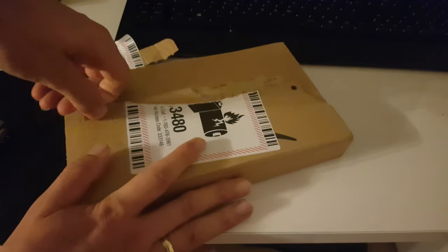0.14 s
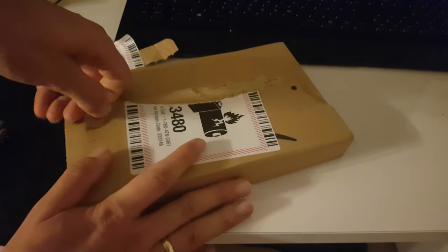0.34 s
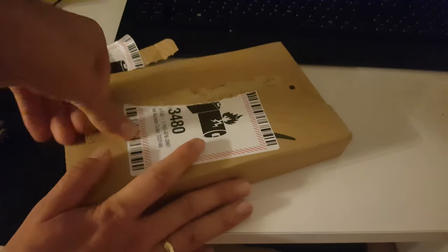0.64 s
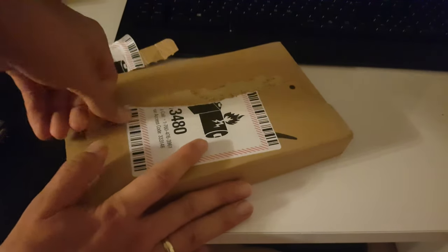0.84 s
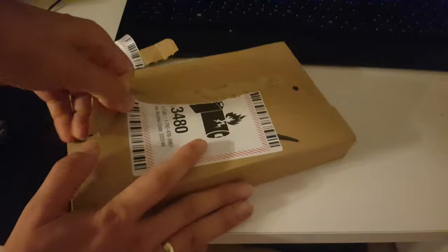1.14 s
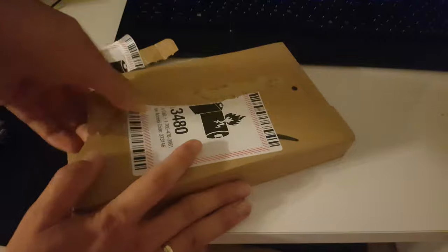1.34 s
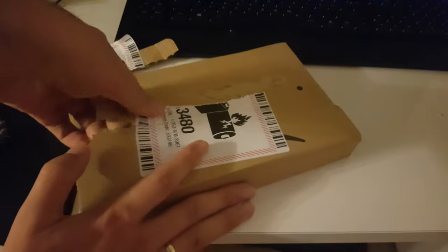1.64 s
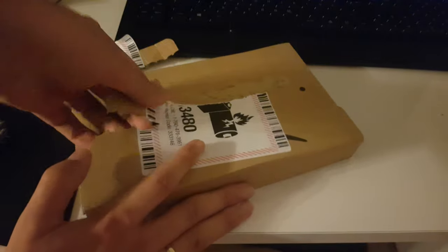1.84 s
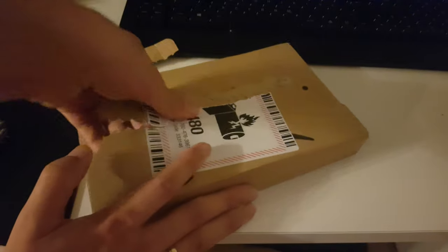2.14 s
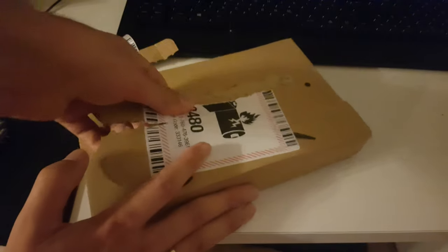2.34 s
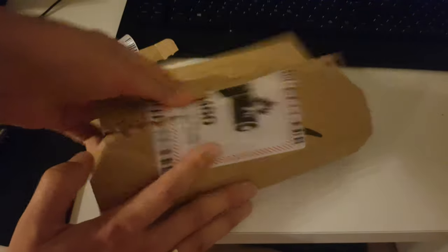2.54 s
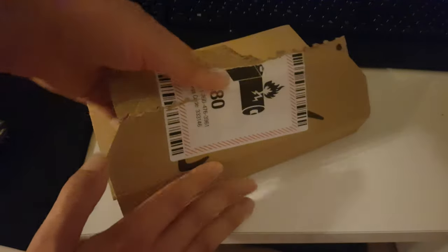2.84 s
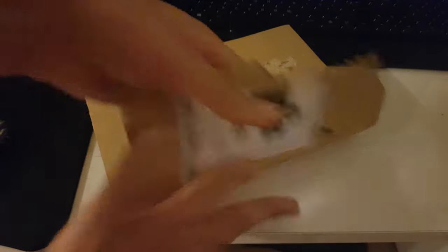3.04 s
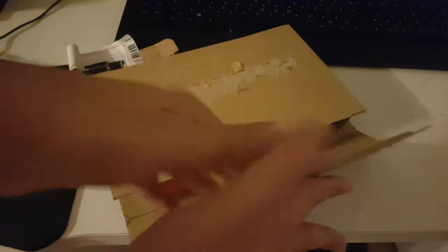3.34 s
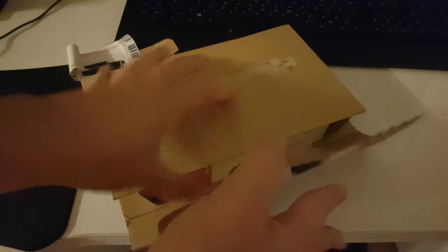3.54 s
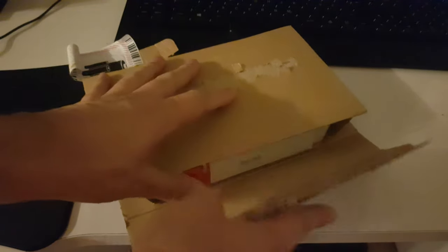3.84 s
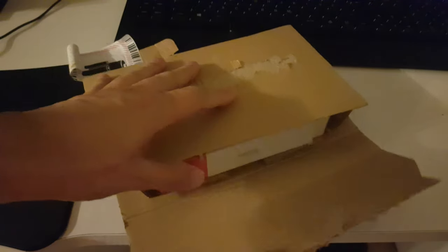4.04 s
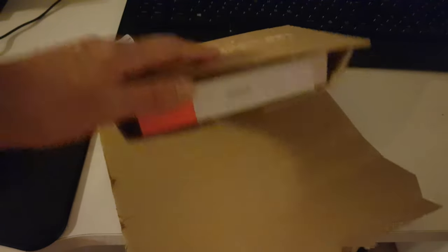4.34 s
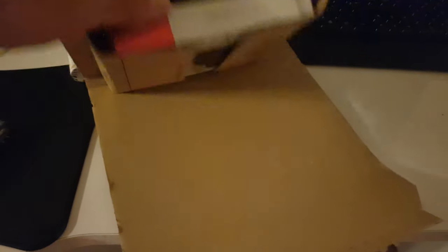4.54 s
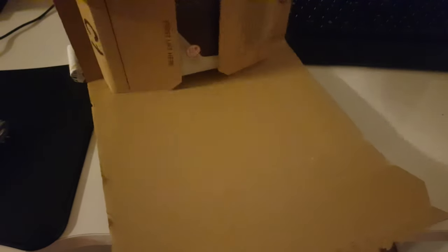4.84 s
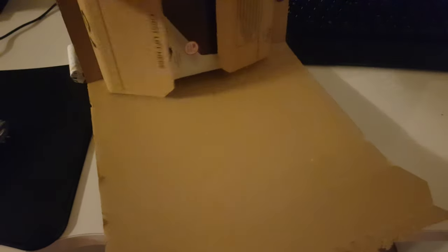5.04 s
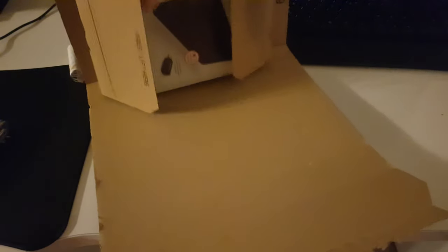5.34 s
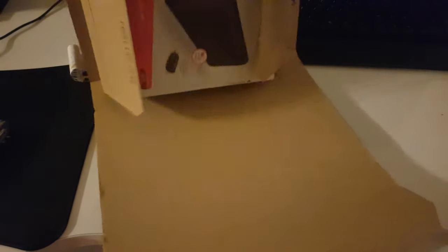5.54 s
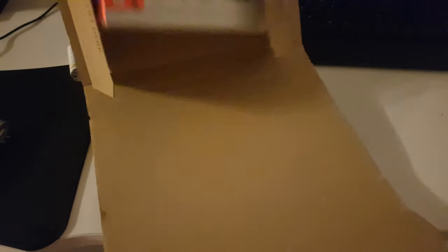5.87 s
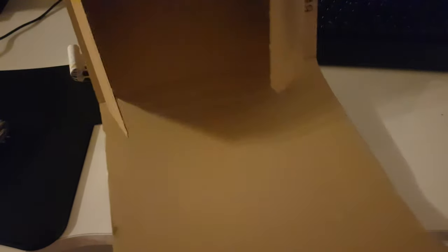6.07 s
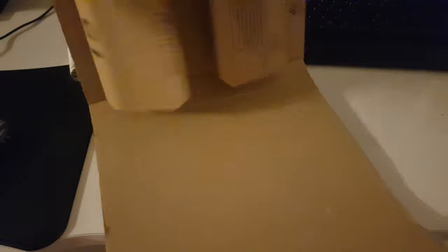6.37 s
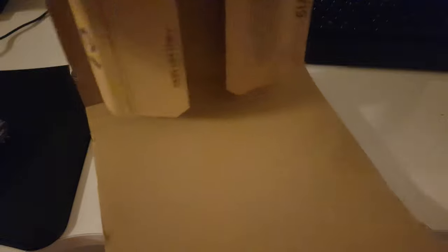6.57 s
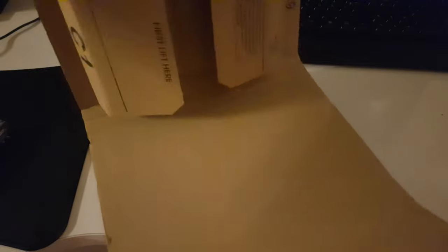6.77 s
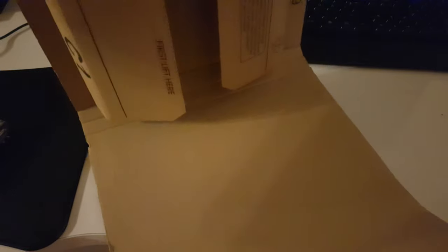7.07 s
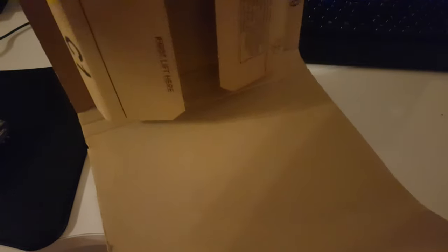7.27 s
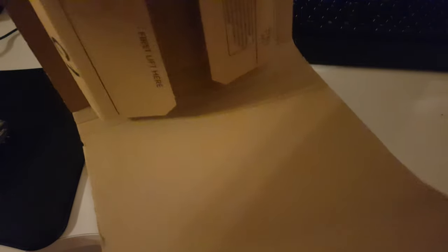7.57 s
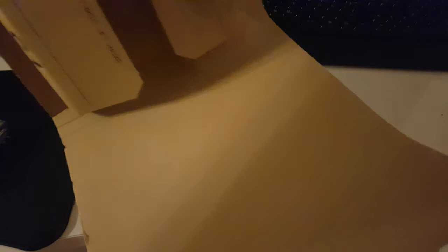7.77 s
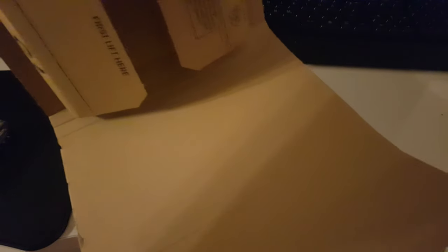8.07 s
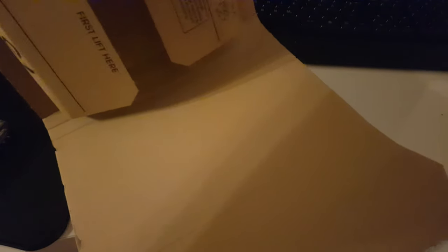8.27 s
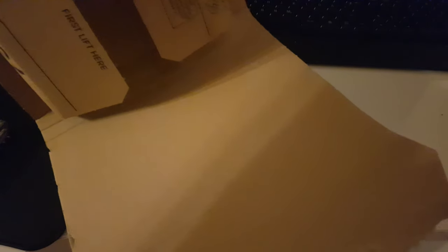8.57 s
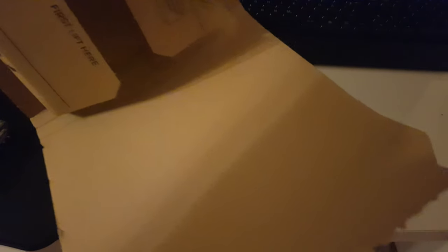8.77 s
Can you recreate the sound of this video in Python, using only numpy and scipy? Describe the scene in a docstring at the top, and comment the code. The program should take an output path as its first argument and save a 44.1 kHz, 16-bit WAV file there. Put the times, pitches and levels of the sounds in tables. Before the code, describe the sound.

Close, dry cardboard tearing with sharp snaps and a brief groan, a heavy final pop, then soft rubbing, scraping contents and faint hollow taps.

```python
"""Opening a glued cardboard box

Hands tear the glued flap of a box on a desk, fold it open, slide the contents out and shift the board.
Fibres part in clumps of random clicks, and glue spots let go as fading bursts of noise with a ringing pop.
Filtered noise rustles, rubs and hums; the board walls and the desk top ring along as tuned resonances.
Two microphone ports a few centimetres apart hear it with a small room's echoes, over their own hiss."""
import sys
import numpy as np
from scipy import signal
from scipy.fft import rfft, irfft
from scipy.io import wavfile

SR = 44100
rng = np.random.default_rng(int(sys.argv[2]) if len(sys.argv) > 2 else 0)


def bounce(signal):
    """Save signal as a 16-bit WAV file at the path given by the first command-line argument."""
    frames = np.transpose(np.atleast_2d(signal))
    limited = np.clip(frames, -1, 1)
    pcm = np.round(limited * 32767).astype(np.int16)
    wavfile.write(sys.argv[1], SR, pcm)


N = 392931

# Levels in the tables are set before the sound's own filters and the final mix.
# In spectrum tables (f/Hz, level/dB) only the shape counts: the overall level is set elsewhere.

# Sudden tugs and jolts:
# (full from t/s, hold t/s, fibre level/dB, paper level/dB, board level/dB, desk level/dB)
TUGS = [(0.0, 0.031, -46.5, -56, -43, -58), (0.102, 0.019, -56.5, -55, -47, -44),
        (0.255, 0.0097, -30.5, -45, -43, -42), (0.425, 0.16, -50.5, -61.5, -45.5, -52),
        (0.571, 0.0046, -42.5, -47, -35.5, -39.5), (0.646, 0.0044, -64, -64, -47, -68.5),
        (0.825, 0.068, -33, -46, -33, -58.5), (0.871, 0.23, -37.5, -43, -39.5, -84),
        (1.013, 0.026, -33.5, -36, -34.5, -47), (1.143, 0.058, -44.5, -44, -47.5, -73),
        (1.196, 0.0025, -34, -41, -34.5, -53), (1.283, 0.051, -50.5, -60, -43, -42),
        (1.337, 0.023, -42, -45, -32.5, -42.5), (1.435, 0.018, -43, -54, -48, -49),
        (1.472, 0.015, -52, -29, -30.5, -43), (1.552, 0.031, -40, -42, -42.5, -43.5),
        (1.642, 0.044, -38, -43, -43.5, -62), (1.695, 0.026, -32, -34, -36, -44),
        (1.748, 0.024, -36.5, -41, -35, -42), (1.84, 0.008, -61, -33.5, -30.5, -42),
        (1.983, 0.0016, -31, -24.5, -17, -28.5), (2.171, 0.048, -50, -48, -48, -45.5),
        (2.292, 0.16, -49, -47, -55, -79), (2.475, 0.0055, -49.5, -38.5, -36, -37),
        (2.552, 0.01, -24, -23, -23, -25.5), (2.809, 0.0063, -50, -46, -41.5, -65.0),
        (3.082, 0.041, -59, -61, -56, -53.5), (3.162, 0.016, -56, -57.5, -56.5, -54),
        (3.441, 0.0027, -64.5, -64, -64, -61), (3.596, 0.0079, -50, -46, -37.5, -32.5),
        (4.153, 0.14, -61, -60.5, -55, -66), (4.326, 0.035, -69, -57, -50, -54.5),
        (5.604, 0.01, -37, -40, -35, -44), (5.615, 0.01, -40.5, -30, -29, -31),
        (6.442, 0.073, -64, -61.5, -54.5, -52.5), (7.55, 0.091, -81, -71, -69.5, -75.5),
        (7.662, 0.082, -72, -63, -56.5, -50), (7.727, 0.079, -60, -53, -47, -50),
        (8.599, 0.0024, -75, -72, -52.5, -47.5), (8.655, 0.008, -86, -74, -57.5, -53)]
# Strokes of hand or board that swell and fade, same columns as the tugs
STROKES = [(2.96, 0.028, -58.5, -59, -54, -59), (3.28, 0.096, -64, -69, -82, -80.5),
           (3.742, 0.0034, -63.5, -54.5, -71, -53), (3.975, 0.16, -63, -62.5, -54.5, -86),
           (4.626, 0.12, -53.5, -51.5, -53.5, -91), (4.8, 0.0046, -56.5, -44.5, -47, -74),
           (4.985, 0.041, -50.5, -42.5, -48, -58), (5.07, 0.016, -50, -43, -43, -55),
           (5.105, 0.01, -44.5, -38.5, -48, -50), (5.257, 0.0074, -39, -34, -40.5, -45),
           (5.324, 0.011, -44.5, -41, -45, -42.5), (5.415, 0.04, -39, -38, -38, -39.5),
           (5.505, 0.023, -46, -41.5, -42, -45), (5.913, 0.2, -46.5, -50.5, -59, -42),
           (6.207, 0.15, -53, -53, -49.5, -48.5), (6.568, 0.061, -54.5, -63, -53, -51.5),
           (6.888, 0.043, -89, -92, -70, -64), (7.062, 0.046, -85.5, -78, -66, -68),
           (7.299, 0.03, -88.5, -77, -65, -54.5), (8.134, 0.033, -75.5, -67.5, -62, -66),
           (8.465, 0.081, -77.5, -69, -64.5, -85), (8.72, 0.067, -85, -80.5, -62.5, -76),
           (8.8, 0.06, -69.5, -66.5, -60.5, -71)]
# Steady contact of hands, box and desk: (t/s, paper level/dB, desk level/dB)
CONTACT = [(0.0, -55.5, -52.5), (0.4, -59.5, -61), (0.8, -50, -46), (1.3, -58, -64), (1.95, -46, -58),
           (2.02, -44.5, -36.5), (2.25, -50, -55), (2.55, -49.5, -57), (2.64, -39.5, -31), (2.9, -61, -54),
           (3.3, -71.5, -87.5), (3.53, -94, -74), (3.65, -56, -47), (3.9, -74.5, -64), (4.45, -61, -63),
           (5.0, -58, -57.5), (5.7, -48.5, -44), (6.3, -52, -79), (6.45, -78.5, -70), (6.75, -75, -67.0),
           (7.2, -89, -81.5), (8.91, -88, -80)]
TUG_RISE_DB_PER_S, TUG_FALL_DB_PER_S = 13998.5, 341.5
STROKE_RISE_DB_PER_S, STROKE_FALL_DB_PER_S = 276, 305
DESK_FALL_SHARE = 0.79   # the desk fades more slowly than the other layers
CONTACT_FIBRE_DB, CONTACT_BOARD_DB = -1.5, 3.5   # over the paper level
TORN_S, EMPTIED_S = 2.9, 6.4   # the flap is off; the box is empty

# Spectrum of the parting fibres: (f/Hz, level/dB)
FIBRE_SPECTRUM = [(1470, -32), (2500, -7.5), (2810, -11), (3160, 2.5), (5050, -6.5), (7180, -7.5),
                  (12600, -5), (15300, -11), (16200, -22.5)]
# Spectrum of the rustling paper: (f/Hz, level/dB)
PAPER_SPECTRUM = [(680, -17), (1150, -14.5), (1450, -1), (1740, 3.5), (2260, -3), (2900, -2.5), (3770, -38),
                  (6380, -120)]
# Spectra of the creasing walls, box full and box empty: (f/Hz, level/dB)
FULL_BOARD_SPECTRUM = [(150, -31.5), (260, -9.5), (439, 1), (594, -9), (706, -1), (1350, -9.5),
                       (1760, -34.5), (2970, -120)]
EMPTY_BOARD_SPECTRUM = [(150, -30), (260, -22), (350, -1.5), (497, -6.5), (833, 3.5), (1220, -2),
                        (1350, -18), (1760, -34), (2970, -120)]
# Spectra of the desk rumble, box full and box empty: (f/Hz, level/dB)
FULL_RUMBLE_SPECTRUM = [(18, -46), (30, -8.5), (64, -4), (124, 0.5), (166, -5.5), (310, -5), (400, -42),
                        (680, -120)]
EMPTY_RUMBLE_SPECTRUM = [(18, -93), (30, -21), (46, -26), (183, -14), (268, -18), (310, -33), (400, -23.5),
                         (680, -120)]

# Glue spots and creases letting go:
# (t/s, crack level/dB, board pop level/dB, board pop f/Hz, bright edge level/dB)
SNAPS = [(0.103, -42, -24, 860, -58), (0.122, -34.5, -34, 385, -41), (0.225, -25, -49, 382, -33.5),
         (0.266, -25, -62, 993, -49), (0.276, -16.5, -34, 406, -20), (0.579, -20.5, -26, 840, -25),
         (0.737, -42.5, -18.5, 846, -50.5), (0.8243, -6.5, -29, 435, -11),
         (0.8295, -16.5, -39.5, 430, -46.5), (0.897, -20, -40, 500, -16), (0.9005, -5.5, -36.5, 537, -19),
         (0.9023, -14, -36, 500, -14), (0.9187, -10, -23.5, 460, -17.5), (0.9365, -28, -22, 1170, -27.5),
         (1.021, -18, -16, 1070, -23), (1.035, -14, -16.5, 490, -16), (1.0735, -27, -33, 420, -20),
         (1.1496, -21.5, -20.5, 1040, -22), (1.1755, -36, -50, 900, -30), (1.183, -30, -42, 900, -32.5),
         (1.1996, -17, -35, 1050, -20), (1.2883, -40, -26, 456, -52), (1.3, -48, -22.5, 463, -52.5),
         (1.3476, -23.5, -26, 850, -29), (1.365, -26, -12, 880, -45.5), (1.4738, -9.5, -10, 1130, -9.5),
         (1.4833, -6, -29, 623, -32.5), (1.488, -5, -37, 496, -10.5), (1.668, -18.5, -40, 1100, -19),
         (1.701, -16, -24.5, 275, -14), (1.706, -28, -17, 855, -34.5), (1.84, -31, -16, 383, -36),
         (1.982, -7.5, -7, 573, -16), (2.1834, -42, -36, 474, -24.5), (2.4383, -23, -31.5, 1030, -43),
         (2.4787, -35.5, -18, 464, -48), (2.4976, -34, -14, 477, -56.5), (2.519, -60.5, -29.5, 480, -71.5),
         (2.5515, -9.5, -1.5, 1470, -17.5), (2.569, -10, -18, 380, -23), (2.5881, -13, 5.5, 1280, -29),
         (2.753, -30.5, -25, 705, -34), (2.809, -27, -24, 1180, -29.5), (3.086, -46, -49, 596, -53),
         (3.097, -44, -49, 780, -45), (3.118, -46, -42, 900, -43), (3.5944, -46, -29, 724, -41),
         (4.1604, -30.5, -37, 460, -34), (4.327, -41.5, -30.5, 790, -50), (4.8702, -28, -29.5, 940, -34),
         (5.191, -49, -28.5, 750, -61), (5.385, -31, -59, 580, -35), (5.615, -21.5, -17, 930, -32),
         (5.872, -28, -51, 930, -30), (6.059, -32, -46, 930, -29.5), (6.212, -38, -40, 400, -42),
         (7.8188, -56.5, -38, 996, -62.5), (8.599, -55.5, -33.5, 960, -50), (8.654, -55, -39.5, 926, -64)]
SNAP_T60_S, SHIVER_T60_S, SHIVER_DB = 0.0064, 0.072, -21   # T60: time to fade by 60 dB
POP_T60_S, POP_SHORTENS = 0.034, 1.8   # fade time at 500 Hz; how steeply higher pops die sooner
POP_OVERTONE, POP_OVERTONE_DB = 1.73, -9   # second mode: multiple of the pop's pitch, relative level
SMALL_WALL_HZ = 560   # only pops above this pitch have the second mode
EMPTY_POPS_LAST = 2.8   # times longer in the emptied box

# The flap buckling with a low groan: (t/s, slip rate f/Hz, level/dB)
GROAN = [(1.836, 128, -36.5), (1.852, 108, -17), (1.891, 130, -18.5), (1.936, 110, -21), (1.981, 110, -25)]
# Resonances of the groaning box: (f/Hz, width f/Hz, level/dB)
GROAN_BODY = [(118.4, 9, 0), (330, 90, -5), (231, 50, -8)]
SLIP_JITTER, SLIP_SPREAD_DB = 0.16, 3.5   # unevenness of pace and of strength
GROAN_RUB = 0.03   # friction noise between slips

# Ringing walls, box full and box empty: (f/Hz, width f/Hz, level/dB)
WALL_RING = [(498, 83, 0)]
EMPTY_RING = [(189, 8.1, -0.5), (820, 83, 0), (1027, 50, 7)]
WALL_RING_DB, EMPTY_RING_DB = -8.5, 0.5   # relative to the board level
# The loose flap, its pitch following the bend: (t/s, pitch f/Hz, level over the paper level/dB)
FLAP = [(0.0, 1554, -7), (0.16, 1630, 7), (0.27, 1630, -3), (1.9, 1500, -10), (2.05, 1460, 3.5),
        (2.35, 1553, 3), (2.55, 1500, -13), (3.2, 1654, -0.5), (4.9, 1564, -17), (5.85, 1455, -23),
        (6.0, 1554, 7.5), (6.15, 1570, -10.5), (8.91, 1644, 0)]
# Modes of the flap: (multiple of the flap's pitch, bandwidth setting f/Hz, level/dB)
FLAP_RING = [(1, 59.06, 2), (1.28, 68.9, -8)]

# Contents sliding in the open box: (t/s, hollow hum level/dB, low drone level/dB)
SLIDE = [(5.63, -38, -44), (5.76, -44, -52.5), (5.88, -47, -53), (5.975, -34, -33.5), (6.034, -31.5, -31),
         (6.056, -24, -36), (6.108, -28, -33.5), (6.182, -34.5, -52), (6.37, -49, -57)]
# Resonances of the hollow of the box: (f/Hz, width f/Hz, level/dB)
HOLLOW = [(893, 18, 0), (945, 22, -5), (1020, 70, -13)]
# Resonance of the long wall: (f/Hz, width f/Hz, level/dB)
DRONE = [(159, 12, 0)]

# Box and hands landing on the desk: (t/s, strength level/dB, extra level of upper modes/dB)
KNOCKS = [(0.567, -45, 0), (0.826, -36, 6), (1.278, -41, 13), (2.583, -11.5, -7.5), (3.448, -36, -19),
          (3.594, -25.5, -1), (4.068, -35, -2), (5.619, -42, -4), (7.817, -39, -11.5), (8.597, -44.5, 4),
          (8.653, -48, 7.5)]
# Modes of the desk top: (f/Hz, level/dB, time to fade by 60 dB t/s)
DESK = [(74.5, -7, 0.34), (112, -7.5, 0.21), (128.5, 0, 0.3), (234, -2, 0.34), (359, 0.5, 0.05)]

# Spectrum of what the surroundings send back: (f/Hz, level/dB)
WALLS_SPECTRUM = [(60, -19), (300, -14.5), (550, -13.5), (1100, -5), (5000, -0.5), (16000, -3)]
EARLY_T60_S, EARLY_DB = 0.0035, 3.5
ROOM_T60_S, ROOM_DB = 0.28, -5
HAND_MOVE_S, FIRST_ECHO_S = .005, .0003   # time between spots; silence before the first echo

# How much louder the left port is than the right: (f/Hz, level/dB)
LEFT_GAIN = [(60, 2.2), (500, 1.6), (2000, 2.8), (8000, 5), (15000, 3.3)]
LEFT_LEAD_S = 0.00018
# Spectrum of the ports' hiss: (f/Hz, level/dB)
HISS_SPECTRUM = [(24, -28.5), (40, -1.5), (81, 5.5), (200, -8.5), (506, -16.5), (1020, -12), (1250, -18.5),
                 (5500, -24.5), (7620, -32.5), (9800, -20.5), (12000, -14.5), (15000, -12.5), (16200, -9)]
HISS_DB = -66
MIC_LOW_CUT_HZ, CUTOFF_HZ = 40, 16450


def effort():
    """Harder work is louder: tugs and strokes add power to steady contact; gives four levels in dB."""
    tugs = moves(TUGS, TUG_RISE_DB_PER_S, TUG_FALL_DB_PER_S)
    strokes = moves(STROKES, STROKE_RISE_DB_PER_S, STROKE_FALL_DB_PER_S)
    paper_db, desk_db = in_time(CONTACT)
    steady = [paper_db + CONTACT_FIBRE_DB, paper_db, paper_db + CONTACT_BOARD_DB, desk_db]
    ms = np.arange(N) / SR * 1000
    levels = []
    for power, steady_db in zip(tugs + strokes, steady):
        total = np.interp(ms, np.arange(len(power)), power) + from_db(2 * steady_db)
        levels.append(10 * np.log10(total))
    return levels


def moves(table, rise_db_per_s, fall_db_per_s):
    """Power of fibres, paper, board and desk, every millisecond: each move rises, holds and falls."""
    t, rows = np.arange(0, N / SR + .002, .001), np.array(table)
    start, hold = rows[:, :1], np.abs(rows[:, 1:2])
    early = rise_db_per_s * np.maximum(start - t, 0)
    late = fall_db_per_s * np.maximum(t - start - hold, 0)
    power = from_db(2 * rows[:, 2:]).T   # twice the dB: power instead of gain
    upper = power[:3] @ from_db(-2 * (early + late))
    desk = power[3:] @ from_db(-2 * (early + DESK_FALL_SHARE * late))
    return np.vstack([upper, desk])


def handling(levels):
    """Fibres crackle in clumps, paper and walls rustle, the desk rumbles; smooth rubbing follows the tear."""
    fibre_db, paper_db, board_db, desk_db = levels
    torn, empty = (np.arange(N) > s * SR for s in (TORN_S, EMPTIED_S))
    jerks = drift(96) * np.where(torn, .1, .7)
    rub = np.where(torn, 7, .9)
    fibres = from_db(fibre_db + 2.3 * jerks) * grains(per_s=1200.0, spread_db=1.5, rub=rub)
    paper = from_db(paper_db + 1.5 * jerks) * grains(per_s=1600.0, spread_db=1.5, rub=rub)
    creases = from_db(board_db + 2 * jerks) * grains(per_s=1300.0, spread_db=2.0, rub=rub)
    pushes = from_db(desk_db) * grains(per_s=710.0, spread_db=-5.0, rub=1.0)
    # the full and the emptied box have spectra of their own
    board = colour(creases * ~empty, FULL_BOARD_SPECTRUM) + colour(creases * empty, EMPTY_BOARD_SPECTRUM)
    rumble = colour(pushes * ~empty, FULL_RUMBLE_SPECTRUM) + colour(pushes * empty, EMPTY_RUMBLE_SPECTRUM)
    return colour(fibres, FIBRE_SPECTRUM) + colour(paper, PAPER_SPECTRUM) + board + rumble


def grains(per_s, spread_db, rub):
    """Random clicks of uneven size on the smooth noise of skin and board rubbing."""
    born = rng.random(N) < per_s / SR
    sizes = from_db(spread_db * np.minimum(rng.exponential(1, N), 4)) * rng.choice([-1, 1], N)
    clicks = rms_one(born * sizes)
    return (clicks + rub * rng.standard_normal(N)) / np.sqrt(1 + rub ** 2)


def snaps():
    """Breaking fibres burst sharply, then shiver; the nearest wall pops in one mode or two."""
    t = np.arange(SR // 4) / SR
    crack, edge, pops = np.zeros((3, N + len(t)))
    fade = from_db(-60 * t / SNAP_T60_S) + from_db(SHIVER_DB - 60 * t / SHIVER_T60_S)
    for s, crack_db, pop_db, pop_hz, edge_db in SNAPS:
        now = slice(round(s * SR), round(s * SR) + len(t))
        burst = rng.standard_normal(len(t)) * fade
        burst[0] = 4.5      # the first break is one sharp click
        crack[now] += from_db(crack_db) * burst
        edge[now] += from_db(edge_db) * burst
        t60 = POP_T60_S * (500 / pop_hz) ** POP_SHORTENS
        if s > EMPTIED_S:
            t60 *= EMPTY_POPS_LAST
        click = 1. * (t == 0)
        pops[now] += from_db(pop_db) * ring(click, pop_hz, t60)
        if pop_hz > SMALL_WALL_HZ:
            pops[now] += from_db(pop_db + POP_OVERTONE_DB) * ring(click, pop_hz * POP_OVERTONE, t60)
    # 1e-18 is inaudible and keeps the filters from slowing down on silence
    middle = band(crack + 1e-18, 2, (1200, 6000), "band")
    top = band(edge + 1e-18, 2, 5200, "high")
    soft = band(pops + 1e-18, 2, (250, 2200), "band")
    return (middle + top + soft)[:N]


def groan():
    """The bent flap slips unevenly on its glue, each slip ringing the box."""
    s, per_s, level_db = np.transpose(GROAN)
    t = np.arange(N) / SR
    pace = np.interp(t, s, per_s) * (1 + SLIP_JITTER * drift(45))
    # one click each time the running count passes a whole number
    slips = np.diff(np.floor(np.cumsum(pace) / SR), prepend=0)
    push = slips * from_db(SLIP_SPREAD_DB * drift(55.4)) + GROAN_RUB * rng.standard_normal(N)
    soft = band(resonances(push, GROAN_BODY), 4, (70, 430), "band")
    return from_db(np.interp(t, s, level_db, left=-200, right=-200)) * rms_one(soft)


def ringing(levels):
    """Handling keeps the box walls and loose flap ringing at their pitches; the emptied box rings hollower."""
    fibre_db, paper_db, board_db, desk_db = levels
    rub = grains(per_s=560.0, spread_db=5.0, rub=1.0)
    full = from_db(WALL_RING_DB) * resonances(rub, WALL_RING)
    emptied = from_db(EMPTY_RING_DB) * resonances(rub, EMPTY_RING)
    walls = np.where(np.arange(N) > EMPTIED_S * SR, emptied, full)
    return from_db(board_db) * walls + flap(paper_db)


def flap(paper_db):
    """Rubbing keeps narrow modes of the flap singing: slow noise carried on their moving pitch."""
    pitch_hz, over_db = in_time(FLAP)
    out = 0
    for multiple, width_hz, level_db in FLAP_RING:
        turn = 2 * np.pi * multiple * np.cumsum(pitch_hz) / SR
        mode = drift(width_hz) * np.cos(turn) + drift(width_hz) * np.sin(turn)
        out = out + from_db(level_db) * mode
    return from_db(paper_db + over_db) * out


def slide():
    """Friction noise sets the hollow of the box and its long wall humming."""
    hum_db, drone_db = in_time(SLIDE)
    rub = rng.standard_normal(N)
    hum = band(resonances(rub, HOLLOW), 2, (780, 1100), "band")
    drone = resonances(rub, DRONE)
    return from_db(hum_db) * hum + from_db(drone_db) * drone


def knocks():
    """A soft blow strikes every desk mode, each by a slightly random amount; the modes ring and fade."""
    s, strength_db, upper_db = np.transpose(KNOCKS)
    out, chance = np.zeros(N), rng.normal(0, 1, (len(s), len(DESK)))
    for k, (hz, level_db, t60) in enumerate(DESK):
        blow_db = strength_db + level_db - 7.5 + 0.5 * chance[:, k]
        if k > 2:   # the upper modes
            blow_db = blow_db + upper_db
        blows = np.full(N, 1e-18)
        blows[np.round(s * SR).astype(int)] = from_db(blow_db)
        out += ring(blows, hz, t60)
    return band(out, 2, 450, "low")


def reflections(x):
    """Desk, box and hands return sound quickly, then the room's tail; both change as the work moves."""
    x = colour(x, WALLS_SPECTRUM)
    answers = room_tail(EARLY_T60_S, EARLY_DB, count=8) + room_tail(ROOM_T60_S, ROOM_DB, count=8)
    steps = np.arange(0, N / SR + HAND_MOVE_S, HAND_MOVE_S)
    spot = rng.integers(0, len(answers), len(steps))   # a random spot at each step
    out = 0
    for k, echoes in enumerate(answers):
        share = np.sqrt(np.interp(np.arange(N) / SR, steps, spot == k))   # smooth crossfade
        out = out + signal.fftconvolve((share * x)[None], echoes, axes=1)[:, :N]
    return out


def room_tail(t60, level_db, count):
    """Dying noise as the answer of walls to a click, one for each spot and port."""
    tail = rng.standard_normal((count, 2, SR // 3)) * from_db(-60 * np.arange(SR // 3) / SR / t60)
    tail[:, :, :round(FIRST_ECHO_S * SR)] = 0
    return from_db(level_db) * tail / np.linalg.norm(tail, axis=2, keepdims=True)


def hiss():
    """Each port has its own faint, steady coloured noise."""
    return from_db(HISS_DB) * np.array([colour(rng.standard_normal(N), HISS_SPECTRUM) for port in range(2)])


def from_db(db):
    """Decibels to gain."""
    return 10 ** (np.asarray(db) / 20)


def rms_one(x):
    """Scales to rms 1, the usual measure of average strength."""
    return x / np.sqrt(np.mean(x ** 2) + 1e-20)


def in_time(rows):
    """Columns of a table over time, sample by sample; -200 (silence in dB) outside the table."""
    s, *columns = np.transpose(rows)
    return [np.interp(np.arange(N) / SR, s, c, left=-200, right=-200) for c in columns]


def band(x, order, hz, kind):
    """Butterworth filter: keeps the low, the high or a band of pitches."""
    return signal.sosfilt(signal.butter(order, hz, kind, fs=SR, output="sos"), x)


def colour(x, spectrum):
    """Filter shaped by a spectrum table, without pre-echo (minimum phase); white noise keeps its rms."""
    hz, db = np.transpose(spectrum)
    grid = np.maximum(np.arange(2049) * SR / 4096, 1)
    log_gain = np.interp(np.log(grid), np.log(hz), db) * np.log(10) / 20
    # folding the cepstrum puts the filter's energy as early as possible
    cepstrum = irfft(log_gain)
    cepstrum[1:2048] *= 2
    cepstrum[2049:] = 0
    taps = irfft(np.exp(rfft(cepstrum)))
    return signal.fftconvolve(x, taps / np.linalg.norm(taps))[:len(x)]


def drift(rate):
    """Slow random wandering with rms 1; a higher rate in Hz wanders faster."""
    r = np.exp(-2 * np.pi * rate / SR)
    noise = rng.standard_normal(N + SR)   # the first second lets the filter settle
    return rms_one(signal.lfilter([1], [1, -2 * r, r * r], noise)[SR:])


def resonances(x, table):
    """Resonances side by side, each favouring sound near its pitch; the sum has rms 1."""
    out = 0
    for hz, width, level_db in table:
        r = np.exp(-np.pi * width / SR)
        feedback = [1, -2 * r * np.cos(2 * np.pi * hz / SR), r * r]
        out = out + from_db(level_db) * rms_one(signal.lfilter([1, 0, -1], feedback, x))
    return rms_one(out)


def ring(clicks, hz, t60):
    """A unit click sets off a fading sine that starts at height 1."""
    r, w = from_db(-60 / (t60 * SR)), 2 * np.pi * hz / SR
    return signal.lfilter([0, np.sin(w)], [1, -2 * r * np.cos(w), r * r], clicks)


def scene():
    """The box sits to the left: louder and earlier there; groan, slide and ringing get no reflections."""
    levels = effort()
    moving = handling(levels) + snaps() + knocks()
    box = moving + groan() + slide() + ringing(levels)
    late = np.interp(np.arange(N) - LEFT_LEAD_S * SR, np.arange(N), box)
    left, right = np.array([box, late]) + reflections(moving)
    # colour() evens out the overall level, so the average boost is put back
    hz, gain_db = np.transpose(LEFT_GAIN)
    boost_db = np.interp(np.log(np.arange(1, SR / 2)), np.log(hz), gain_db).mean()
    louder_left = from_db(boost_db) * colour(left, LEFT_GAIN)
    return from_db(-4.5) * np.array([louder_left, right]) + hiss()


def record(dry):
    """The deep bass is cut, peaks clip near full scale, then the top is cut."""
    thin = band(dry, 3, MIC_LOW_CUT_HZ, "high")
    clipped = np.clip(thin, -.95, .95)
    return signal.sosfilt(signal.cheby2(14, 60, CUTOFF_HZ, fs=SR, output="sos"), clipped)


dry = scene()
out = record(dry)
bounce(out)
```